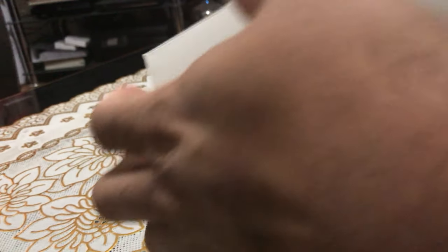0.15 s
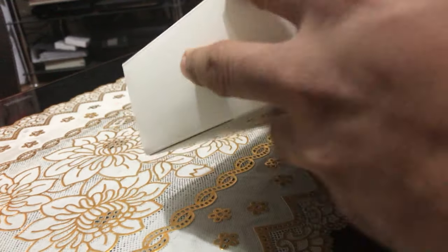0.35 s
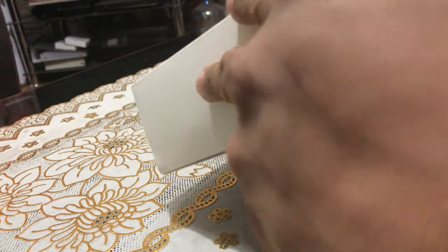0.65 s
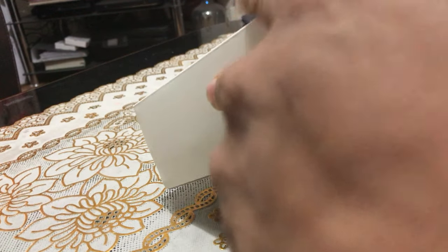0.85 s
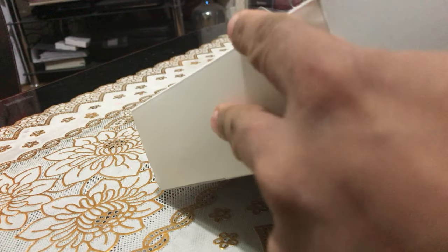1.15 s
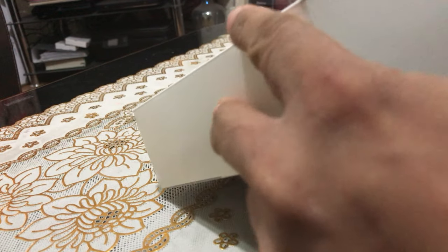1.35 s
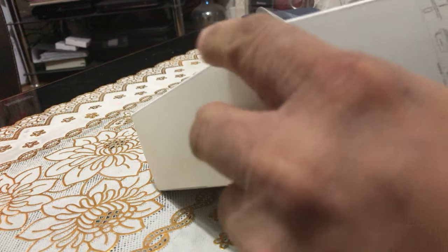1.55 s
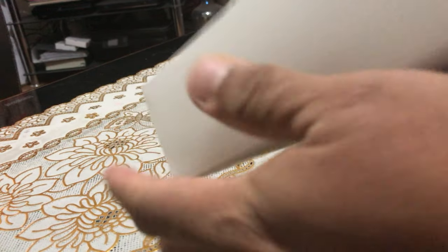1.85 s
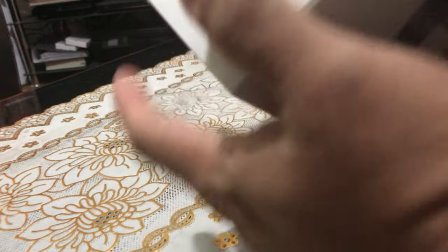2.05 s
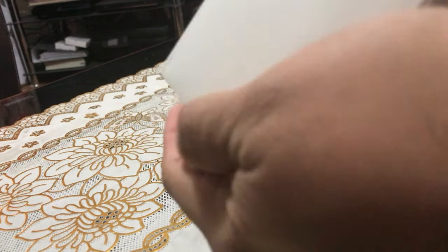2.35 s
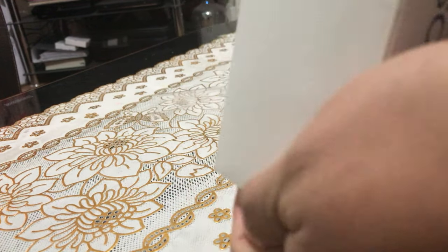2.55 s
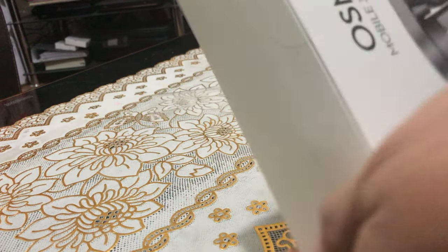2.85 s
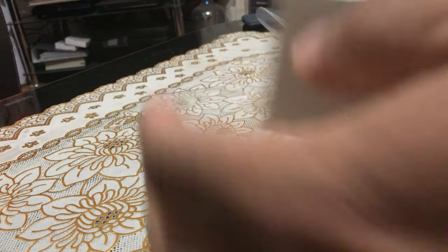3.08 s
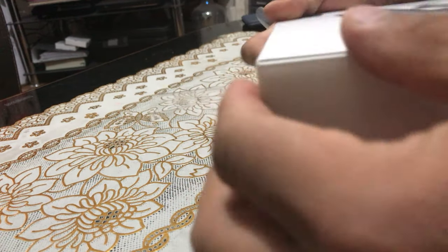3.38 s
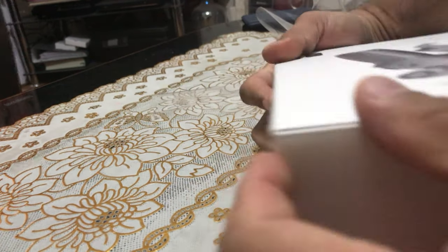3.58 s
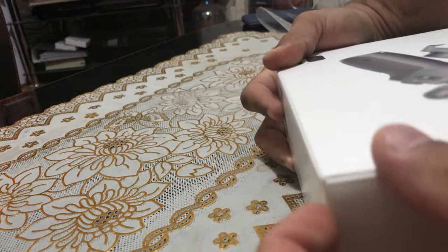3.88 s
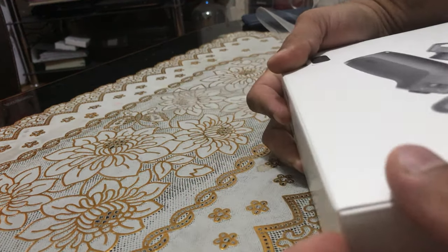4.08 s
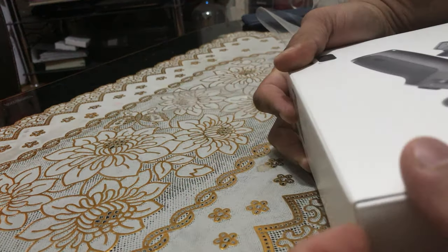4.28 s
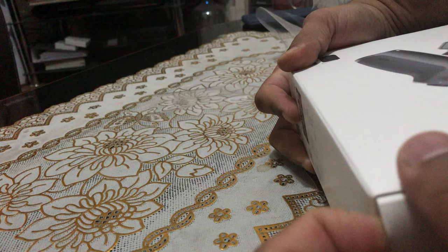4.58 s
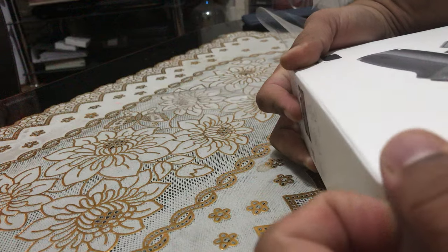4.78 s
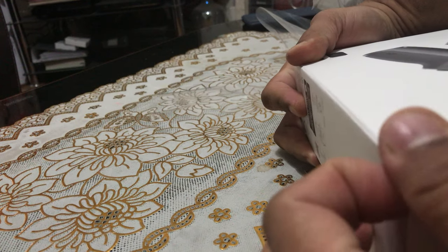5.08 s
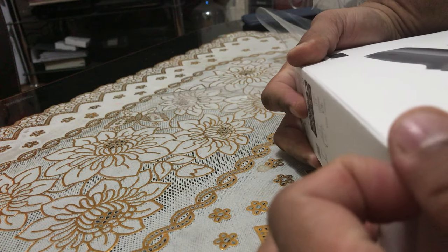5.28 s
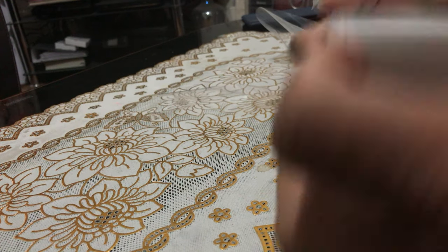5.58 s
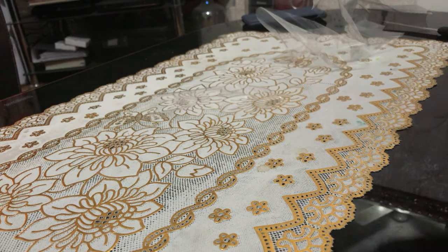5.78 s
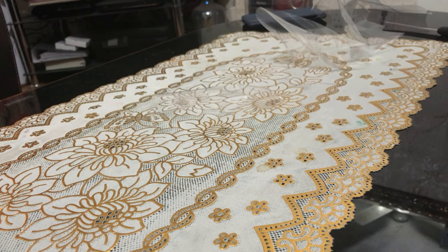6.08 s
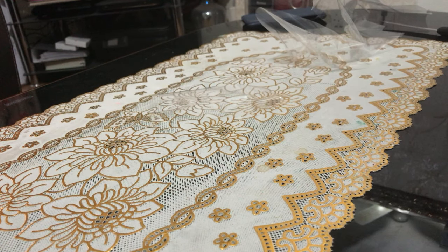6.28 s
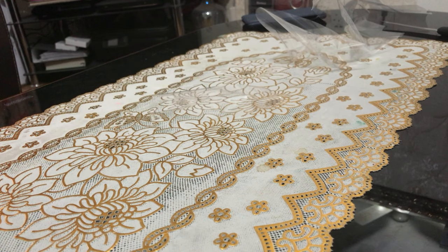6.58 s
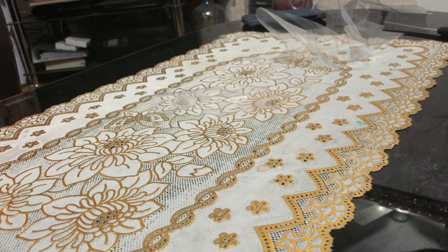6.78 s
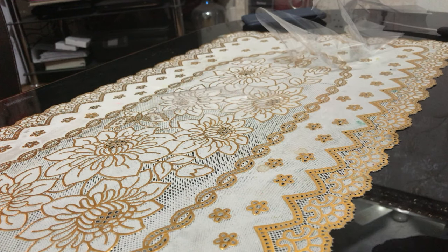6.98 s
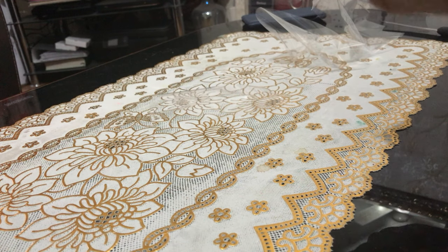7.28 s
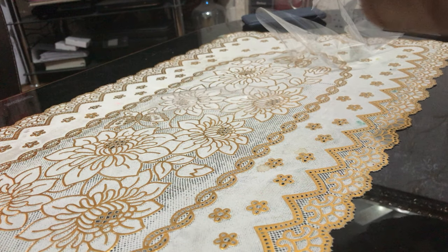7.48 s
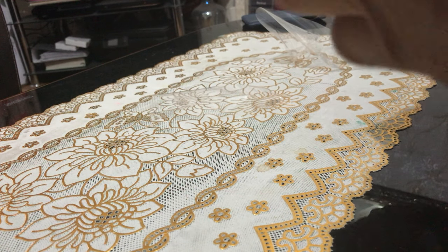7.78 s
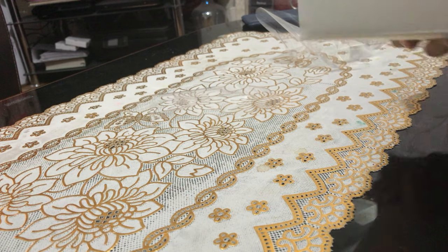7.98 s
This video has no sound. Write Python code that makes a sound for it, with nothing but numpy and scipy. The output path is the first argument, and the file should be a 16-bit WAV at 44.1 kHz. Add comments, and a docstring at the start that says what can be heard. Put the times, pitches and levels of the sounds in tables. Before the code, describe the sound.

Hands turn and pick at a film-wrapped cardboard box close up, with rubbing, sharp crackles, hollow bumps and a brief high nail chirp.

```python
"""A cardboard box in clear plastic wrap, turned and picked at by hands close to the microphone in a small room.
Skin hisses and card rubs as shaped noise with slips; edges scrape, and a nail chirps once, in stick-slip runs.
Film snaps and bumps pair a noise crack with the ringing of the panels and the hollow box.
Later the room's answer is brighter, as from a box farther off. Faint ticks stand over quiet room air."""
import sys
import numpy as np
from scipy import signal
from scipy.fft import rfft, irfft, next_fast_len
from scipy.io import wavfile
from scipy.ndimage import map_coordinates

SR = 44100
rng = np.random.default_rng(int(sys.argv[2]) if len(sys.argv) > 2 else 0)


def wrap_up_sound(samples):
    """Save the sound to the file named by the first command line argument, as 16-bit audio."""
    columns = np.atleast_2d(samples).T
    # keep every value between -1 and 1, then stretch to whole-number steps
    tamed = np.clip(columns, -1, 1)
    steps = np.round(tamed * 32767).astype(np.int16)
    wavfile.write(sys.argv[1], SR, steps)


N = 358974

# a hand slides over the wrapped box: start_s, length_s, skin_hiss_db, card_rub_db (before trims)
STROKES = [(0.025, 0.14, -90, -56), (0.308, 0.13, -63.5, -79), (0.532, 0.1, -64, -82),
           (0.845, 0.08, -58.5, -56.5), (0.945, 0.1, -91, -60.5), (1.068, 0.067, -64, -62.5),
           (1.43, 0.13, -68, -69), (1.605, 0.18, -64, -62), (1.867, 0.091, -74, -51.5),
           (1.951, 0.13, -65, -50), (2.111, 0.059, -48.5, -46), (2.209, 0.11, -48.5, -54.5),
           (2.322, 0.17, -58.5, -54), (2.51, 0.2, -58, -77), (2.71, 0.15, -55.5, -54.5),
           (2.876, 0.091, -62, -55.5), (2.989, 0.041, -52.5, -54.5), (3.307, 0.18, -62, -65),
           (3.507, 0.072, -55, -51.5), (3.73, 0.07, -68, -57), (4.004, 0.063, -67, -61.5),
           (4.42, 0.04, -60, -62), (4.67, 0.29, -70.5, -70), (5.517, 0.09, -55.5, -62),
           (5.631, 0.055, -56, -63), (5.69, 0.13, -57.5, -79), (5.87, 0.061, -74, -60),
           (6.443, 0.144, -72.5, -70), (6.634, 0.062, -65, -69), (6.742, 0.038, -66, -65),
           (7.815, 0.09, -65, -57), (7.954, 0.33, -65.5, -67)]
STROKE_ATTACK_S, STROKE_RELEASE_S = 0.009, 0.011
ARCH_DB = 2  # a movement is this much stronger in its middle than at its ends
# low flexes of the card as the grip tightens, and soft low bumps: start_s, length_s, level_db (before trims)
LOW_FLEXES = [(0.11, 0.057, -46), (0.22, 0.16, -53.5), (1.645, 0.015, -43), (1.91, 0.12, -42.5),
              (2.06, 0.1, -47.5), (2.36, 0.15, -53.5), (3.64, 0.27, -50.5), (3.8, 0.04, -42.5),
              (6.64, 0.054, -56), (6.755, 0.015, -54)]
LOW_FLEX_ATTACK_S, LOW_FLEX_RELEASE_S = 0.011, 0.04
# light contact of the holding fingers between strokes: time_s, rub_level_db (before trims)
HOLD = [(0, -62.5), (1.25, -69), (1.7, -66), (2.6, -67), (3.2, -64.5), (4.3, -66), (5.3, -73.5),
        (5.7, -66.5), (7.1, -71.5), (7.7, -68), (8.13, -76)]
HOLD_HISS_DB, HOLD_FLEX_DB = -7, -2.5  # over its rub
# the film snaps under a finger: time_s, panel_level_db, hardness (0 fingertip to 1 nail),
# pitch_hz of the pressed spot
SNAPS = [(0.025, -58, 0.28, 1300), (0.0604, -50, 0.42, 800), (0.084, -52, 0.48, 1400),
         (0.092, -53.5, 0.21, 1200), (0.1752, -48, 0.72, 880), (0.384, -55.5, 0.47, 1400),
         (0.3918, -55.5, 0.91, 2220), (0.456, -51, 0.62, 1260), (0.4753, -54.5, 0.28, 1100),
         (0.5746, -53.5, 0.93, 630), (0.5871, -54, 0.75, 1200), (0.594, -51.5, 0.47, 1170),
         (0.731, -55, .06, 940), (0.7643, -53, 0.36, 850), (0.8247, -54, 0.32, 1100),
         (0.8516, -48.5, 0.31, 1400), (1.0138, -55, .03, 570), (1.1895, -57.5, 0.23, 570),
         (1.2915, -56.5, 0.51, 746), (1.3415, -56, 0.25, 760), (1.4236, -48.5, 0.44, 1020),
         (1.469, -47.5, 0.12, 990), (1.4888, -49, 0.23, 1000), (1.864, -57.5, 0.39, 1390),
         (1.9558, -49.5, 0.43, 800), (2.0112, -42, 0.49, 750), (2.028, -52, 0.4, 700),
         (2.2133, -45.5, 0.17, 1580), (2.5733, -47.5, 0.47, 1600), (2.719, -52, .22, 1110),
         (2.89, -53, 0.54, 1300), (3.0796, -51, 0.47, 1900), (3.1614, -61, 0.75, 1200),
         (3.274, -59, .1, 595), (3.371, -57.5, .8, 1600), (3.396, -61, 0.76, 1700),
         (3.45, -57.5, 0.61, 1500), (3.628, -56, 0.22, 1500), (3.7453, -59.5, 0.61, 1600),
         (3.772, -50, 0.12, 1320), (3.912, -55, .8, 1820), (4.1132, -54.5, 0.51, 1490),
         (4.792, -61.5, 0.82, 960), (4.8962, -55, 0.6, 750), (4.965, -56.5, 0.25, 945),
         (5.0983, -56.5, 0.26, 1040), (5.113, -59, .35, 1190), (5.1428, -59, 0.48, 1090),
         (5.154, -62, 0.4, 1400), (5.168, -58.5, 0.23, 900), (5.5265, -59, 0.65, 1520),
         (5.575, -52, 0.71, 1010), (6.0864, -52.5, 0.41, 1620), (6.46, -60.5, .1, 1100),
         (6.4839, -58, 0.06, 1390), (6.6321, -57.5, 0.18, 600), (6.6573, -60.5, 0.25, 700),
         (6.68, -60, 0.3, 760), (6.7211, -57.5, 0.29, 620), (7.2756, -55, 0.34, 1700),
         (7.322, -63.5, 0.24, 1700), (7.383, -63, 0.11, 1200), (7.5338, -59, 0.66, 890),
         (7.5557, -56, 0.24, 1800), (7.5853, -59, 0.29, 1710), (7.654, -61.5, 0.38, 700),
         (7.667, -58, 0.22, 2120), (7.7094, -57, 0.42, 1490), (7.7179, -56.5, 0.47, 2000),
         (7.8293, -51, .45, 2020)]
# what hardness does to a snap: at_fingertip, at_nail
SNAP_KNOCK_DB = (-0.5, -7)  # hollow knock over the panels, dB
SNAP_CRACK_DB = (-7, 5.5)  # crack over the panels, dB
SNAP_TILT_DB = (-11, 4)  # crack tilt, dB per octave
# the box is bumped or set down: time_s, knock_db, panel_db, crack_db, tilt_db_per_octave,
# contact_s, pitch_hz of the struck spot
KNOCKS = [(0.1101, -41, -48.5, -53, -5, 0.00095, 800), (1.4488, -45, -51, -46, -3, 0.00061, 1220),
          (1.6433, -28.5, -26.5, -49.5, -0.5, 0.00048, 870), (1.9400, -41, -45, -45.5, -8, 0.00037, 790),
          (2.004, -44, -48, -34.5, -4.5, 0.00044, 1200), (2.1901, -36.5, -44, -41, -1, 0.00018, 1030),
          (2.3553, -46, -50.5, -47.5, -9, 0.0018, 1100), (4.1951, -28.5, -38.5, -32, -6.5, 0.00021, 1600),
          (4.4225, -33.5, -40.5, -42.5, -4, 0.0006, 1540), (5.5815, -42.5, -48.5, -47.5, -7, 0.00066, 1370),
          (6.2507, -25.5, -32, -36.5, -8.5, 0.00029, 970)]
SPOT_Q = 1.97  # how sharply a struck spot picks its own pitch out of the panel modes
# scrapes of an edge, and one brief high nail chirp: peak_s, rise_s, fall_s, level_db, centre_hz,
# squeak_db at the centre
SCRAPES = [(0.699, 0.0078, 0.009, -52, 2710, 18), (0.908, 0.025, 0.017, -30.5, 2065, -1),
           (1.451, 0.0084, 0.004, -32, 1280, -19), (1.643, 0.0042, 0.0025, -34.5, 3400, -9),
           (1.6435, 0.00063, 0.00084, -21, 9600, 10), (1.948, 0.021, 0.0064, -34, 324, -20),
           (2.012, 0.039, 0.031, -33.5, 304, -27.5), (2.449, 0.024, 0.0064, -42.5, 2800, 3),
           (2.606, 0.028, 0.028, -44, 1710, -3), (2.737, 0.0057, 0.016, -43, 1170, -34),
           (3.34, 0.016, 0.0071, -45.5, 5600, 0), (3.565, 0.019, 0.011, -37, 556, -4),
           (5.651, 0.0031, 0.005, -25.5, 1380, 7.5), (5.654, 0.0066, 0.0047, -27.5, 4200, -3),
           (5.781, 0.0078, 0.011, -48, 1240, -7)]
# resonances of the whole hollow box: pitch_hz, width_hz, level_db
HOLLOW = [(191, 88, -3), (320, 118, 0.5), (439, 78, -2)]
# resonances of its faces: pitch_hz, width_hz, level_db
PANELS = [(530, 105, 11), (1010, 280, 1.5), (1244, 140, 2), (1520, 190, 0), (2010, 1100, -4.5)]
# spectra, each listing frequency_hz, level_db (per Hz)
# snapping film
CRACK = [(1200, -4), (2600, 3), (4300, 1.5), (6200, 0.5), (7600, -3), (9700, -3.5), (11000, -6.5),
         (18000, -7)]
# sliding skin
SKIN = [(800, -5), (3000, 0.5), (6200, 4), (7600, 1), (9200, 3), (10300, -2), (12500, 4), (18000, -5)]
# rubbed card
RUB = [(150, 7), (330, 9.5), (560, -0.5), (720, -4), (1100, 2), (1700, 1), (2800, -7), (4300, -5.5),
       (7000, -24.5), (16000, -40)]
# flexing card
FLEX = [(20, -12), (75, 2.5), (120, -2), (175, 1), (290, -4), (450, -13), (850, -23), (1600, -51.5)]
# a scraping edge
EDGE = [(70, -8.5), (250, 19), (550, 13.5), (1500, 3.5), (2100, 2.5), (2900, -3.5), (4300, 1), (5100, -6),
        (9000, -7.5), (18000, -10.5)]
# room air
AIR = [(20, -17.5), (70, 10), (130, 1), (350, 0.5), (550, -14), (1550, -19), (5000, -23), (10400, -33.5),
       (17000, -36.5)]
# how long the small room rings, before its tone filter: frequency_hz, t60_s
ROOM = [(150, 0.23), (400, 0.25), (2800, 0.18), (7000, 0.17), (16000, 0.12)]
FAR_S = 5.9  # from then on the box is heard farther off
# what that adds to the sound sent to the room: frequency_hz, change_db
FAR_WET = [(1200, -1.5), (1800, 3.5), (4000, 4.5), (6500, 3)]
TOP_HZ = 18400  # the microphone's band limit


def amp(db):
    """Decibels to gain."""
    return 10 ** (np.asarray(db) / 20)


def unit(x):
    """Scale to rms 1."""
    return x / np.sqrt(np.mean(x ** 2) + 1e-20)


def along(points, hz):
    """Read (Hz, value) points on a log axis."""
    f, v = np.transpose(points)
    return np.interp(np.log(hz + 1), np.log(f + 1), v)


def curves(rows):
    """One value per sample for each column after the time."""
    s, *cols = np.transpose(rows)
    return [np.interp(np.arange(N) / SR, s, c) for c in cols]


def wobble(rate):
    """A smooth random curve, rate knots a second."""
    knots = rng.standard_normal(int(N * rate / SR) + 4)
    return map_coordinates(knots, [np.arange(N) * rate / SR])


def filtered(x, response):
    """x times a response of frequency."""
    m = next_fast_len(len(x) + 4096)
    return irfft(rfft(x, m) * response(np.fft.rfftfreq(m, 1 / SR)), m)[:len(x)]


def coloured(x, spectrum):
    """x filtered by the given spectrum, at rms 1."""
    return unit(filtered(x, lambda hz: amp(along(spectrum, hz))))


def evened(x):
    """x with most of its spectral peaks and dips levelled, so that it rings at no pitch."""
    z = rfft(x)
    return irfft(z / (np.abs(z) + 1e-9) ** 0.75, len(x))


def ringing(x, modes):
    """x through resonances whose strength and pitch vary a little at random."""
    varied = []
    chance = rng.standard_normal((len(modes), 2)) * [1.5, 0.025]  # dB, fraction of pitch
    for k, ((centre, width, db), (change, detune)) in enumerate(zip(modes, chance)):
        gain = (-1) ** k * amp(db + change)  # neighbours take opposite sign
        varied.append((centre * np.exp(detune), width, gain))
    return filtered(x, lambda f: sum(g * 1j * f * w / (c * c - f * f + 1j * f * w) for c, w, g in varied))


def slips(rate, spread_db, size=N):
    """Irregular stick-slip impulses, about rate a second, of random sign and size, at rms 1."""
    sizes = amp(spread_db * np.clip(rng.standard_normal(size), -2, 2)) * rng.choice([-1, 1], size)
    return unit(sizes * (rng.random(size) < rate / SR))


def add(track, s, sound):
    """Mix a sound into the track at time s."""
    start = max(round(s * SR), 0)
    track[start:start + len(sound)] += sound[:max(len(track) - start, 0)]


def movements(rows, attack_s, release_s):
    """Gain of (start, length, dB) movements: each sets in, arches over its length and dies away."""
    power, t = np.zeros(N), np.arange(N) / SR
    for start, length, db in rows:
        near = slice(*np.searchsorted(t, [start - 0.2, start + length + 0.3]))
        age = t[near] - start
        edges = np.exp(np.minimum(age, 0) / attack_s - np.maximum(age - length, 0) / release_s)
        arch = np.sin(np.pi * np.clip(age / length, 0, 1)) - 2 / np.pi
        power[near] += (amp(db + ARCH_DB * arch) * edges) ** 2
    return np.sqrt(power)


def handling(hiss_db=2.0, rub_db=-0.5, flex_db=-1, crinkle_db=-3, fidget_db=2.5, prickle=0.3, judder=1.11):
    """Skin hisses and rubs in strokes, card flexes, judders and bumps low, rubbing crinkles the film."""
    hold = amp(curves(HOLD)[0] + fidget_db * wobble(5.7))
    strokes = np.array(STROKES)
    hiss_strokes = movements(strokes[:, [0, 1, 2]], STROKE_ATTACK_S, STROKE_RELEASE_S)
    rub_strokes = movements(strokes[:, [0, 1, 3]], STROKE_ATTACK_S, STROKE_RELEASE_S)
    low_flexes = movements(LOW_FLEXES, LOW_FLEX_ATTACK_S, LOW_FLEX_RELEASE_S)
    # movements and the light, fidgeting hold add in power
    hiss = np.hypot(hiss_strokes, amp(HOLD_HISS_DB) * hold)
    rub = np.hypot(rub_strokes, hold)
    flex = np.hypot(low_flexes, amp(HOLD_FLEX_DB) * hold)

    skin_grain = rng.standard_normal(N) + prickle * slips(rate=620, spread_db=6.5)
    skin = hiss * amp(hiss_db + 2.1 * wobble(32)) * coloured(skin_grain, SKIN)
    pressure = 2.8 * wobble(30)  # dB
    card_grain = rng.standard_normal(N) + 0.72 * slips(rate=180, spread_db=3.5)
    card = rub * amp(rub_db + pressure) * coloured(card_grain, RUB)
    grasp = 2.6 * wobble(30)  # dB
    body_grain = rng.standard_normal(N) + judder * slips(rate=81, spread_db=2.5)
    body = flex * amp(flex_db + grasp) * coloured(body_grain, FLEX)
    return skin + card + body + rub * amp(crinkle_db) * crinkles()


def crinkles(rate=42, spread_db=1.5, fold_hz=1500, fold_octaves=0.94, count=3):
    """Folds of several sizes buckle at random for a couple of milliseconds and shake the card under them."""
    out = np.zeros(N)
    for octave in np.linspace(-1, 1, count) * fold_octaves:
        snaps = slips(rate, spread_db)
        buckling = signal.fftconvolve(snaps, rng.standard_normal(128) * np.hanning(128))[:N]
        fold = unit(ringing(snaps, HOLLOW + PANELS)) + 0.5 * coloured(buckling, CRACK)

        def fold_band(hz):
            distance = np.log2((hz + 1) / fold_hz) - octave  # octaves from this fold's pitch
            return 0.34 + 1 / (1 + (2 * distance) ** 2)
        out += unit(filtered(fold, fold_band))
    return unit(out)


def knocks_and_snaps(lead=0.00095):
    """Film snaps and bumps ring the same box; a harder snap has more and brighter crack and less knock."""
    out = np.zeros(N)
    for s, db, hardness, face_hz in SNAPS:
        ranges = (SNAP_KNOCK_DB, SNAP_CRACK_DB, SNAP_TILT_DB)
        knock, crack, tilt = (soft + hardness * (hard - soft) for soft, hard in ranges)
        add(out, s - lead, blow(db + knock, db, db + crack, tilt, face_hz=face_hz))
    for s, *contact in KNOCKS:
        add(out, s - lead, blow(*contact))
    return out


def blow(knock_db, panel_db, crack_db, tilt_db, contact_s=0.00059, face_hz=1000,
         panel_lag=0.0006, knock_lag=0.00083, crack_decay_s=0.024):
    """The crack comes first; slower bending waves then pass from the struck spot to the faces and whole box."""
    t = np.arange(2048) / SR
    out = np.zeros(len(t))

    def at_level(x, db):
        return amp(db) * unit(x) * np.sqrt(0.02 / t[-1])  # level over 20 ms

    def push(width):
        return t / width * (2 - t / width) * np.exp(-t / width)  # press and release

    onset = (1 - np.exp(-t / 0.00025)) ** 2
    burst = evened(rng.standard_normal(len(t)) * amp(-60 * t / crack_decay_s) * onset)
    burst = burst * amp(-30 * t / crack_decay_s)
    tilted = [(hz, db + tilt_db * np.log2(hz)) for hz, db in CRACK]
    add(out, 0, at_level(coloured(burst, tilted), crack_db))
    # a blow that is strong in the faces but weak in the crack is a longer, softer contact
    face_contact_s = 0.00008 * amp(np.clip(0.8 * (panel_db - crack_db), -3, 7))
    spot = ringing(push(face_contact_s), [(face_hz, face_hz / SPOT_Q, 0)])
    add(out, panel_lag, at_level(ringing(spot, PANELS), panel_db))
    add(out, knock_lag, at_level(ringing(-push(contact_s), HOLLOW), knock_db))
    return out


def scrapes(skirt_db=-13, sharpness=6):
    """A run of edge or nail slips swells and dies, driving one band hardest, where it may squeak."""
    out, t = np.zeros(N), np.arange(-8192, 8192) / SR
    for s, rise, fall, db, centre, squeak in SCRAPES:
        drive = slips(rate=2900, spread_db=0.0, size=len(t))

        def focus(hz):
            octaves = np.log2((hz + 1) / centre)
            band = np.exp(-(octaves / 1.9) ** 2)
            return amp(skirt_db * (1 - band)) + amp(squeak) / np.hypot(1, (sharpness * octaves) ** 4)
        swell = np.exp(-np.abs(t / np.where(t < 0, rise, fall)) ** 1.5)
        add(out, s + t[0], amp(db) * swell * coloured(filtered(drive, focus), EDGE))
    return out


def room(x, count=16):
    """Decaying noise tails as the walls' echo, a fresh random one for each of count equal stretches of time."""
    out = np.zeros(N)
    for part in np.array_split(np.arange(N), count):
        hz, t, z = signal.stft(rng.standard_normal(SR // 2), SR, nperseg=256)
        decay = amp(-60 * t / along(ROOM, hz)[:, None])
        tail = signal.istft(z * decay, SR, nperseg=256)[1]
        echo = signal.fftconvolve(x[part], tail / np.linalg.norm(tail))
        add(out, part[0] / SR + 0.005, echo)  # 5 ms after the direct sound
    tone = [(200, -5.0), (800, 0.5), (2800, 0.5), (5000, -3.5), (9000, -6.0)]  # Hz, dB
    return filtered(out, lambda hz: amp(along(tone, hz)))


def scene(wet_db=-14.5):
    """The box near the microphone, its echo and the room's air."""
    box = handling() + knocks_and_snaps() + scrapes()
    far = np.arange(N) / SR > FAR_S
    far_send = filtered(box * far, lambda hz: amp(along(FAR_WET, hz)))
    send = box * ~far + far_send
    air = amp(-67.0) * coloured(rng.standard_normal(N), AIR)
    return (box + room(amp(wet_db) * send) + air)[None]


def record(dry, low_cut_hz=29):
    """The microphone sheds the deepest rumble and keeps nothing above its band limit."""
    def response(hz):
        return (hz < TOP_HZ) * (1 - np.exp(-(hz / low_cut_hz) ** 4))
    return filtered(dry[0], response)[None]


dry = scene()
out = record(dry)
wrap_up_sound(out)
```